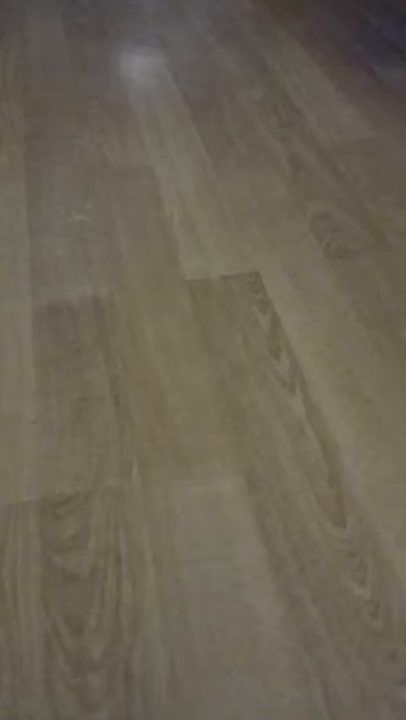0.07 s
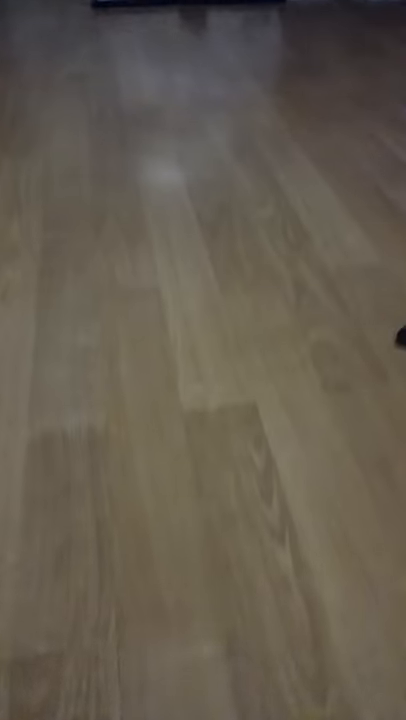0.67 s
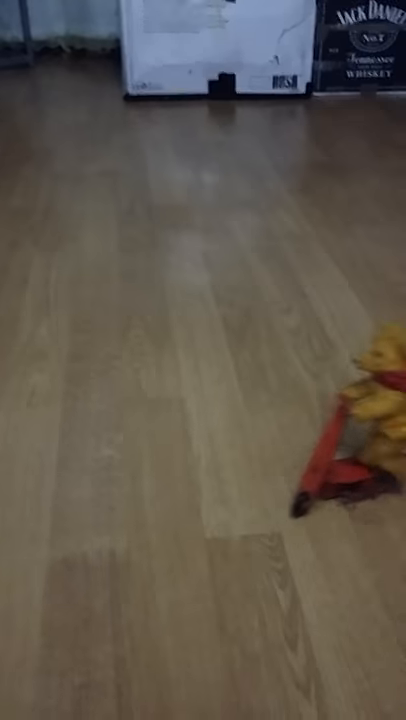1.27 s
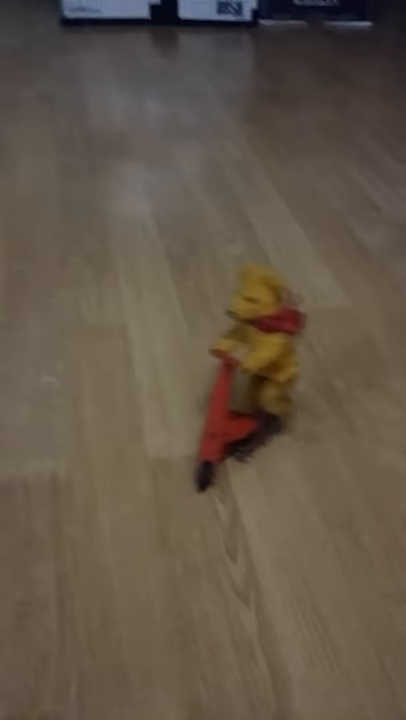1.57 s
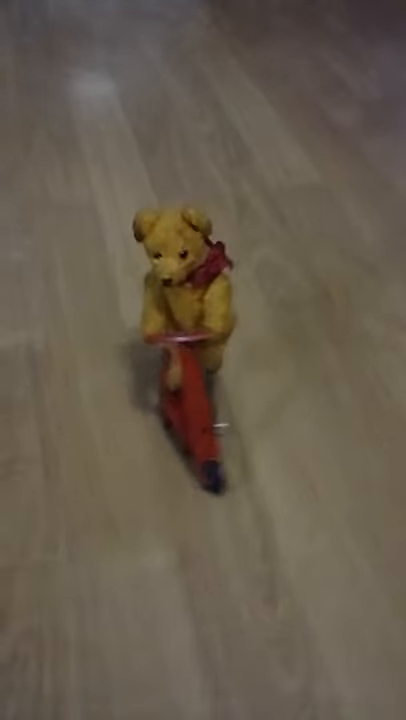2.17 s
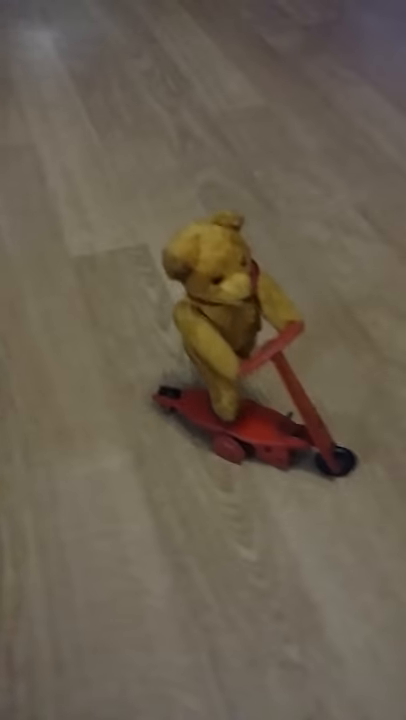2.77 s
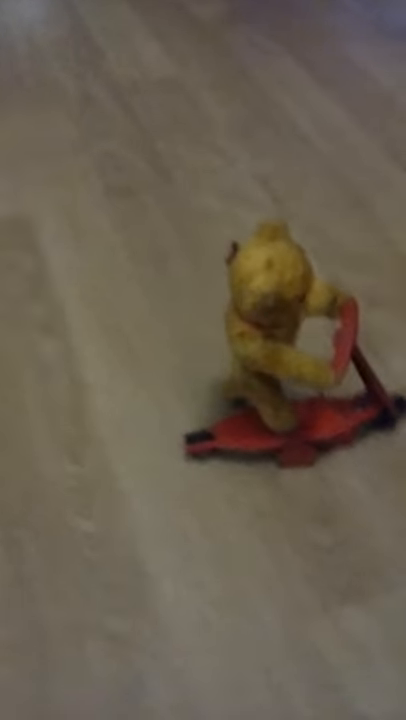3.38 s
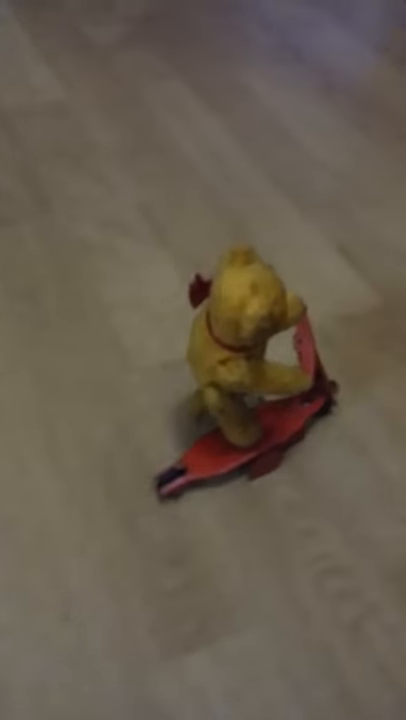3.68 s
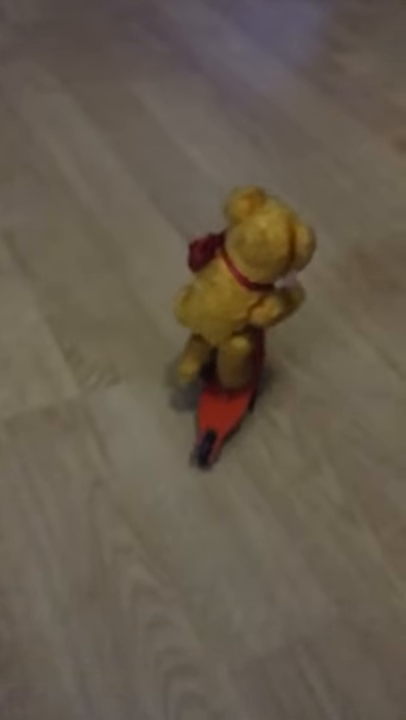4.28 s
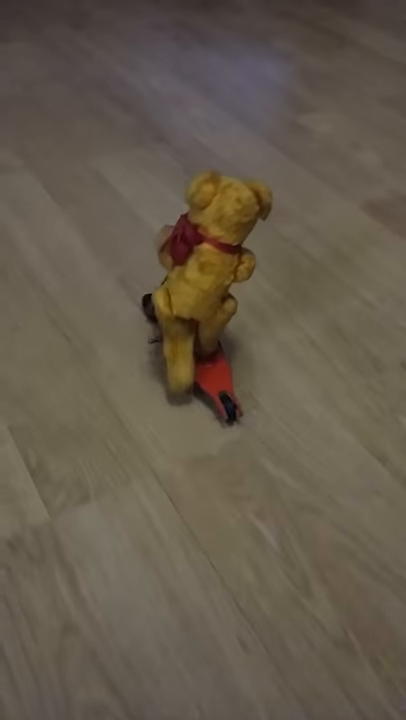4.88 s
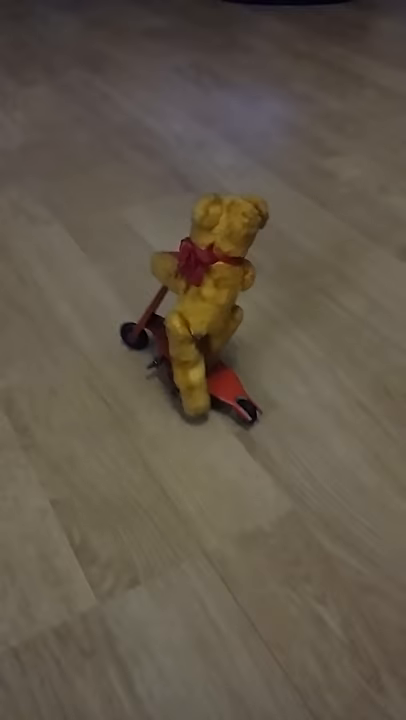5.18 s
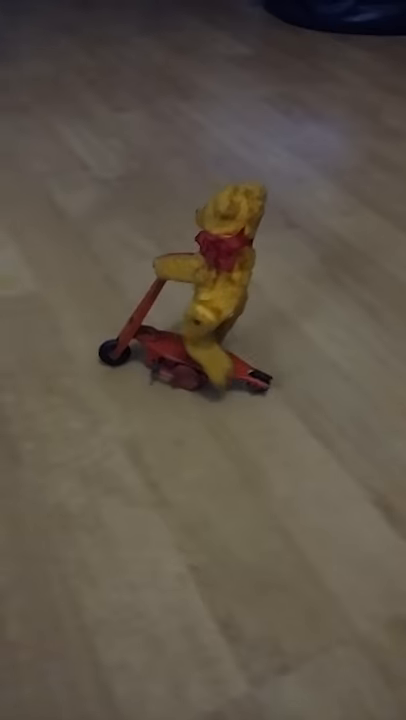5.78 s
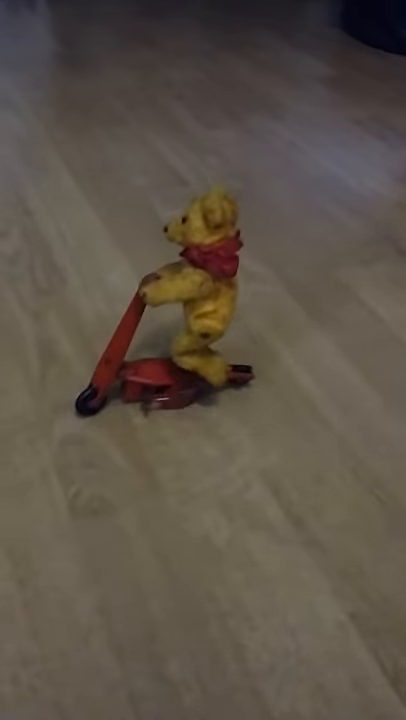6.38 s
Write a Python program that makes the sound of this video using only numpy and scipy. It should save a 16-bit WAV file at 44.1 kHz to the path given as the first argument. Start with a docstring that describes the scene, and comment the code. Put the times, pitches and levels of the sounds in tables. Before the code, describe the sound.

A wind-up tin toy scoots across a hard floor, its bright whirring rattle surging rhythmically, with sharp little clacks.

```python
"""A whirring tin chatter fades in: a clockwork bear scoots round a laminate floor in a small quiet room.
The off-centre governor of its spring motor spins about a hundred times a second: it makes the loose tin
parts chatter, knocks the chassis on the floor and hums. Each kick of the leg loads the motor, so speed
and rattle surge three times a second. A faint clear tone comes and goes, the floor thuds softly near
the start, and the leg linkage clacks in short, ringing runs."""
import sys
import numpy as np
from scipy import signal
from scipy.fft import rfft, irfft
from scipy.io import wavfile
from scipy.ndimage import uniform_filter1d

SR = 44100
rng = np.random.default_rng(int(sys.argv[2]) if len(sys.argv) > 2 else 0)


def wav_out(sig):
    """Save sig, one row per channel (or a flat mono array), as 16-bit PCM at SR to the path in sys.argv[1]."""
    wavfile.write(sys.argv[1], SR, np.round(np.clip(np.atleast_2d(sig).T, -1, 1) * 32767).astype(np.int16))


N = 288414
T = np.arange(N) / SR
ROOM_T60_S = 0.27


def from_db(db):
    return 10 ** (np.asarray(db) / 20)


def unit_rms(x):
    return x / np.sqrt(np.mean(x ** 2) + 1e-20)


def automation(rows):
    """One lane per column after the time, drawn sample by sample."""
    times, *columns = np.transpose(rows)
    return [np.interp(T, times, column) for column in columns]


def centred(db):
    """A level lane about its median."""
    return db - np.median(db)


def eq_curve(points, hz):
    """Breakpoints joined on a log-frequency axis."""
    point_hz, values = np.transpose(points)
    return np.interp(np.log(hz + 1), np.log(point_hz), values)


def drift(per_s):
    """A smooth random wobble of rms 1."""
    return unit_rms(np.interp(T * per_s, np.arange(4096), rng.standard_normal(4096)))


def bumps(times, width_s):
    """A bell curve of height 1 at each time."""
    return sum(np.exp(-((T - s) / width_s) ** 2) for s in times)


def clicks(times, sizes):
    """A train of single-sample impacts."""
    at = np.round(np.asarray(times) * SR).astype(int)
    inside = (at >= 0) & (at < N)
    return np.bincount(at[inside], np.asarray(sizes)[inside], N)


def knocks(beats, lag_s, jitter_s, spread_db):
    """One contact per governor turn, a little uneven in time and force."""
    late, force = rng.standard_normal((2, 1024))[:, :len(beats)]
    return clicks(beats + lag_s + jitter_s * late, from_db(spread_db * force))


def ticks(per_s, db):
    """Tiny impacts, random in time and size."""
    return (rng.random(N) < per_s / SR) * rng.standard_normal(N) * from_db(db)


def filtered(x, order, hz, kind):
    return signal.sosfilt(signal.butter(order, hz, kind, fs=SR, output="sos"), x)


def levelled(x, window=3500):
    """Even out slow swells, holding the mono mix near rms 1."""
    power = uniform_filter1d(x.mean(0) ** 2, window)
    return x / np.sqrt(np.maximum(power, 0) + 1e-12)


def ride_band(x, band_hz, db):
    """Swell and fade one band about its usual level."""
    band = signal.sosfiltfilt(signal.butter(2, band_hz, "band", fs=SR, output="sos"), x)
    return x + (from_db(centred(db)) - 1) * band


def resonance(x, hz, width_hz):
    """A ringing band whose centre can glide."""
    carrier = np.exp(2j * np.pi * np.cumsum(np.broadcast_to(hz, N)) / SR)
    pole = np.exp(-np.pi * width_hz / SR)
    return 2 * np.real(carrier * signal.lfilter([1 - pole], [1, -pole], x / carrier))


# Stereo placement. Each row: frequency in Hz, left over right in dB.
STEREO_BALANCE = [(100, -1.5), (190, -5), (330, 2.5), (700, -1.5), (1600, -1), (2600, -3.5), (3800, -10.5),
                  (4600, 1.5), (5500, 9.5), (7800, 9.5), (10000, 7.5), (12700, -9.5), (16000, -1)]
# Stereo width. Each row: frequency in Hz, likeness of the two sides (1 is mono).
STEREO_LIKENESS = [(100, 0.99), (300, 1), (600, 0.89), (1200, 0.15), (3000, 0.24), (6000, 0.048),
                   (12000, 0.086)]


def body_response(colour, t60, room_db, modes=(), modes_db=0, size=16384):
    """The stereo answer to one knock: a body's crowded short rings, any longer tones, the room's tail."""
    t, hz = np.arange(size) / SR, np.fft.rfftfreq(size, 1 / SR)
    body = unit_rms(from_db(-60 * t / t60))
    room = unit_rms(from_db(-60 * t / ROOM_T60_S) * (t > .006))
    mid, side = rfft(rng.standard_normal((2, size)) * np.hypot(body, from_db(room_db) * room))
    if len(modes):
        rings = 0
        for mode_hz, db, ring_s in modes:
            detune = rng.normal(1, .035)  # a slightly different pitch in each response
            tone = np.sin(2 * np.pi * mode_hz * detune * t) * rng.choice([-1, 1])
            rings = rings + from_db(db - 60 * t / ring_s) * tone
        mid = mid + from_db(modes_db) * rfft(unit_rms(rings))
    sides = np.array([[1], [-1]])
    alike = np.clip(eq_curve(STEREO_LIKENESS, hz), 0, 1)
    pan = from_db(sides * eq_curve(STEREO_BALANCE, hz) / 2)
    gain = from_db(eq_curve(colour, hz)) * pan / np.hypot(*pan)
    # a passive body answers only after the blow: minimum phase
    cepstrum = irfft(np.log(gain)) * (1 + np.sign(t)) * (t < t[size // 2])
    stereo = np.sqrt(1 + alike) * mid + np.sqrt(1 - alike) * side * sides
    out = irfft(stereo * np.exp(rfft(cepstrum)))
    return out / np.sqrt(np.sum(out ** 2) / 2)


def moving_body(drive, colour, stretches, **body):
    """Play a body on the move, crossfading to a new response for each stretch of its path."""
    out, step = np.zeros((2, 2 * N)), N // stretches + 1
    for centre in range(0, N + step, step):
        at = np.arange(max(centre - step, 0), min(centre + step, N))
        faded = drive[at] * np.cos(np.pi / 2 * (at - centre) / step)
        part = signal.fftconvolve(faded[None], body_response(colour, **body), axes=1)
        out[:, at[0]:at[0] + part.shape[1]] += part
    return out[:, :N]


# Leg kicks, each lasting until the next. Each row: start in seconds, fastest swing in seconds,
# top speed in turns per second, then chatter, hum and hum octave faders in dB.
LEG_KICKS = [(0.46, 0.66, 109, -26.5, -45.5, -43), (0.777, 0.942, 107.6, -26, -45, -48),
             (1.084, 1.263, 114, -27, -45, -47.5), (1.389, 1.531, 103.6, -27, -47.5, -44),
             (1.664, 1.836, 103.3, -28, -50.5, -51), (1.988, 2.168, 109, -25, -50, -43),
             (2.28, 2.446, 103, -27, -51, -47.5), (2.611, 2.831, 96.5, -26.5, -46.5, -42.5),
             (2.924, 3.138, 94.6, -28, -44, -44), (3.27, 3.414, 96, -27.5, -49, -45.5),
             (3.473, 3.835, 95, -27, -46, -42.5), (3.972, 4.2, 96, -27, -46, -43.5),
             (4.373, 4.51, 92.5, -29, -46.5, -42.5), (4.625, 4.864, 98, -29, -49, -45.5),
             (5.08, 5.251, 97.5, -29.5, -48, -51.5), (5.387, 5.595, 94.5, -29, -48.5, -49.5),
             (5.799, 5.957, 89.4, -29, -55.5, -55.5), (6.138, 6.315, 93.6, -29, -51.5, -55.5)]


def spring_motor():
    """Each kick loads the motor, then lets it race; the load drags more as the spring runs down."""
    start, fastest, *columns = np.transpose(LEG_KICKS)
    top_speed, top_db, hum_db, octave_db = (np.interp(T, fastest, column) for column in columns)
    end_s = start[-1] + .39
    corners = np.append(np.column_stack([start, fastest]), end_s)
    load = np.interp(T, corners, 1 - np.arange(len(corners)) % 2)  # 1 at a kick's start, 0 in free swing
    speed = top_speed - load * (2.5 + T)
    # the loose parts chatter hardest around the fastest swing
    chatter_db = top_db - (1.8 + .28 * T) * load - 2 * (1 - bumps(fastest, width_s=.035))
    stall = bumps(np.append(start, end_s), width_s=.035)
    dip_db = -10.5 * stall
    return speed, load, stall, chatter_db, hum_db + dip_db, octave_db + dip_db


def governor_beats(speed):
    """The time of each turn; the weight's swing is drawn into step with the hard clacks."""
    turns = np.cumsum(speed * (1 + .008 * drift(20))) / SR
    clack_s = np.array(HARD_CLACKS)[:, 0]
    slip = np.unwrap(np.interp(clack_s, T, turns) % 1, period=1)
    turns = turns - np.interp(T, clack_s, slip)
    return np.interp(np.arange(1, int(turns[-1])), turns, T)


# Each part's presence. Each row: time in seconds, then deck plate, shell and gear rides in unscaled dB.
PART_RIDES = [(0.62, -3, -0.5, -11), (1.08, -4, -3, -9), (1.24, -4.5, -3.5, -10), (1.58, -4.5, -1.5, -5.5),
              (2.22, -5, -3.5, -7), (2.38, -4, -4.5, -6), (2.63, -4, -5, -10), (2.97, -3, -3, -7.5),
              (3.55, -3.5, 2.5, -10), (3.74, -5.5, -5, -12), (4.29, -6, -2.5, -8.5), (4.45, -5, -6.5, -9),
              (4.88, -4.5, 0, -8), (5.04, -4, -5, -8.5), (5.53, -4, -3.5, -8), (5.93, -2.5, -4, -9),
              (6.15, -3, -3, -11), (6.52, -4, -6.5, -9)]
# The strongest shell ring, moving with the bear's pose. Each row: time in seconds, pitch in Hz.
SHELL_PITCH = [(.6, 3670), (1.5, 3200), (1.8, 3620), (2.15, 3361), (2.85, 3400), (3.15, 3480), (3.4, 3750),
               (3.56, 3500), (3.75, 3300), (4.1, 4060), (4.9, 3690), (5.25, 3984), (5.6, 3670), (6.5, 3560)]
# Two lesser rings. Each row: time in seconds, deck plate pitch in Hz, its level in dB, gear cage in Hz.
PLATE_AND_CAGE = [(0.4, 2660, -31, 5330), (1.8, 2650, -1, 5630), (2.5, 2350, 3, 5240),
                  (3.1, 2620, -5, 5367), (3.7, 2783, -1.5, 4460), (4.3, 2710, -8, 4420),
                  (5.3, 2609, -19, 4270), (6.54, 2545, -20, 4903)]
# The lowest tin ring, strong when the toy is side-on and near. Each row: time in seconds, level in dB.
LOWEST_TIN_LEVEL = [(2.3, -29), (2.75, 6), (3.15, -5.5), (3.5, -3), (3.85, -6), (4.25, 11), (4.7, -28),
                    (5.9, -10), (6.4, -4)]


def circling(x):
    """As the toy circles, its parts turn towards the listener and away, and their rings shift."""
    plate_ride, shell_ride, gear_ride = map(centred, automation(PART_RIDES))
    plate_hz, plate_db, cage_hz = automation(PLATE_AND_CAGE)
    # the loose shell shifts its contacts; the stiff plate and cage wander less
    shell_hz = automation(SHELL_PITCH)[0] * (1 + .059 * drift(16))
    plate_hz, cage_hz = (hz * (1 + .012 * drift(16)) for hz in (plate_hz, cage_hz))
    flicker_db = 5
    shell_db = -4.5 + 1.3 * shell_ride + flicker_db * drift(15)
    shell = from_db(shell_db) * resonance(x, shell_hz, width_hz=320)
    plate = from_db(plate_db + flicker_db * drift(7.1)) * resonance(x, plate_hz, width_hz=90)
    cage = from_db(-4 + flicker_db * drift(20)) * resonance(x, cage_hz, width_hz=320)
    low = from_db(automation(LOWEST_TIN_LEVEL)[0]) * resonance(x, hz=2024, width_hz=100)
    x = ride_band(x + shell + plate + cage + low, band_hz=(1750, 2820), db=2.9 * plate_ride)
    x = ride_band(x, band_hz=(3520, 3770), db=.66 * shell_ride)
    return ride_band(x, band_hz=(4470, 6400), db=1.15 * gear_ride)


# The tin shell's bright tone. Each row: frequency in Hz, level in dB.
TIN_EQ = [(500, -13), (900, -11.5), (1200, -12), (1600, -14.5), (2050, -9.5), (2600, -1.5), (3200, -3),
          (3800, -3), (4500, -5), (5500, -9.5), (6300, -15.5), (7800, -17), (11000, -31.5), (13500, -32.5),
          (16000, -28.5)]
# Its main rings. Each row: pitch in Hz, relative level in dB, seconds to fall 60 dB.
TIN_MODES = [(2160, -7.5, 0.024), (2707, -0.5, 0.018), (3210, 6, 0.083), (3525, 3, 0.19),
             (3910, 7.5, 0.089)]


def tin_chatter(beats, chatter_db, parts=4):
    """Each turn, loose tin parts hit in a row, hardest in mid-swing; gear teeth tick and rub between."""
    shake = from_db(1.6 * drift(60))
    rattle = 0
    for k in range(parts):
        swing = np.sin(np.pi * (k + .5) / parts)
        hits = knocks(beats, lag_s=(k - 1) * .0011, jitter_s=.00035, spread_db=2) * shake * swing
        teeth = ticks(per_s=160, db=-13)
        rattle = rattle + moving_body(hits + teeth, TIN_EQ, stretches=16, t60=.012, room_db=1.9,
                                      modes=TIN_MODES, modes_db=-11.5)
    rattle = filtered(levelled(rattle), order=1, hz=8000, kind="low")
    rub = moving_body(rng.standard_normal(N), TIN_EQ, stretches=30, t60=.013, room_db=-1)
    rub = from_db(6) * filtered(rub, order=3, hz=7000, kind="high")
    chatter = levelled(circling(rattle + rub), window=2200)
    # hard shaking rings the shell more than it rubs the gears
    chatter = ride_band(chatter, band_hz=(3330, 3700), db=.28 * chatter_db)
    chatter = ride_band(chatter, band_hz=(5700, 15500), db=-.42 * chatter_db)
    return from_db(chatter_db + .5 * drift(25)) * chatter


# The floor under the wheels. Each row: time in seconds, wheel fader in dB,
# then boom, drone and clatter rides in unscaled dB.
FLOOR_RIDES = [(0.62, -38, -10, -11, -6.5), (1.02, -34.5, 3, 2.5, -2), (1.27, -32.5, -18, 0.5, -4),
               (1.73, -34.5, -21, -3.5, -8), (2.07, -35.5, -21, -4.5, -17),
               (2.26, -32.5, -27.5, -1.5, -16.5), (2.63, -34, 9, -4.5, -13), (3.18, -35, 0, -22, -5.5),
               (3.34, -37, 0, -11, -6.5), (3.75, -35, -6, -15, -7), (4.15, -36, 7, -3, -2),
               (4.35, -32, -2, -27, -10), (4.51, -37, 6, -11, -2.5), (4.67, -36, -13, -2.5, -10.5),
               (5.49, -36.5, 0, -3.5, -14), (5.65, -36, -19, -4, -9), (5.9, -38.5, -10, -6, -11),
               (6.36, -35.5, -19, 1, 0.5), (6.52, -35, -15, 0, -10)]
# The boards' two resonances. Each row: time in seconds, drone in Hz, clatter in Hz.
FLOOR_PITCHES = [(.7, 335, 570), (1.3, 348, 570), (1.8, 318, 586), (2.3, 415, 650), (2.7, 397, 666),
                 (3.15, 340, 690), (3.8, 321.1, 879.2), (4.2, 325, 810), (4.7, 349.6, 620),
                 (5.4, 378, 523.3), (5.9, 400, 680.5), (6.35, 355, 699.7)]


def floorboards(x):
    """The boards boom, drone and clatter differently from place to place."""
    _, boom_ride, drone_ride, clatter_ride = automation(FLOOR_RIDES)
    drone_hz, clatter_hz = automation(FLOOR_PITCHES)
    drone = from_db(-7 + 5.1 * centred(drone_ride)) * resonance(x, drone_hz, width_hz=270)
    clatter = from_db(-4 + 2.9 * centred(clatter_ride)) * resonance(x, clatter_hz, width_hz=190)
    x = ride_band(x + drone + clatter, band_hz=(69, 230), db=.39 * boom_ride)
    return x - .47 * resonance(x, 1.24 * clatter_hz, width_hz=250)  # a scoop just above the clatter


# The dull tone of the chassis on the boards. Each row: frequency in Hz, level in dB.
CHASSIS_EQ = [(30, -90), (75, -61), (112, -7.5), (150, -3), (185, -8.5), (240, -7), (315, -2.5),
              (410, -3.5), (560, -9.5), (750, -9.5), (950, -16), (1200, -20.5), (2000, -36)]
# Low ringing tones under the drumming, the lowest two probably the room's.
# Each row: pitch in Hz, relative level in dB, seconds to fall 60 dB.
LOW_RINGS = [(303.7, 7.5, 0.1), (355, 9.5, 0.27), (427, 15.5, 0.094), (542, 8.5, 0.11), (705, 25, 0.077)]


def wheel_drumming(beats, speed, stall):
    """The wheels drum unevenly on the floorboards, booming a little more at each stall."""
    drum = 0
    for _ in range(2):
        hits = knocks(beats, lag_s=0, jitter_s=.00047, spread_db=2.8)
        rolling = ticks(per_s=200, db=-11.5)
        drum = drum + moving_body(hits + rolling, CHASSIS_EQ, stretches=20, t60=.014, room_db=-2.5,
                                  modes=LOW_RINGS, modes_db=-32)
    drum = filtered(drum, order=3, hz=135, kind="high")
    drum = levelled(floorboards(drum))
    drum = ride_band(drum, band_hz=(140, 263), db=2.5 * stall)
    # at twice the turning rate the floor moves with the hum rather than with the wheels
    return drum - .8 * resonance(drum, 2 * speed, width_hz=45)


# Lurches of the toy. Each row: time in seconds, change of wheel level in dB.
LURCH_ACCENTS = [(1.05, 2), (1.35, -1), (1.58, 1.5), (2.41, 1), (2.818, 1), (3.17, 3), (3.278, 4),
                 (4.071, 2), (4.67, 2), (4.98, 2.5), (5.35, 2.5), (5.7, 3.5), (6.431, 4)]


def wheel_fader():
    """The drumming's gain follows the boards underneath and jumps as the toy lurches."""
    lurch_db = sum(db * bumps([s], width_s=.036) for s, db in LURCH_ACCENTS)
    return from_db(automation(FLOOR_RIDES)[0] + lurch_db + drift(25) + .46)


def governor_hum(speed, hum_db, octave_db):
    """The unbalanced governor shakes the floor at its turning rate and the octave."""
    phase = 2 * np.pi * np.cumsum(speed) / SR + .25 * drift(40)
    octave = from_db(octave_db + 1.6 + drift(43)) * np.sin(2 * phase + .2 * drift(40))
    fundamental = from_db(hum_db + 1.4 * drift(50)) * np.sin(phase)
    return np.sqrt(2) * (fundamental + octave)


# A long clear tone that comes and goes. Each row: time in seconds, level in dB.
SINGING_LEVEL = [(.6, -51), (.9, -45), (1.2, -57), (1.6, -48), (1.9, -58), (3, -57), (3.2, -41), (3.4, -56),
                 (4.05, -52.5), (4.3, -41), (4.5, -48), (5, -46.5), (5.5, -48), (5.7, -39.5), (5.85, -48),
                 (6.03, -44), (6.15, -55), (6.5, -53)]


def singing_ring():
    """The shaking keeps one narrow resonance singing, probably the mainspring."""
    ring = resonance(rng.standard_normal((1, N)), hz=500, width_hz=6)
    return from_db(automation(SINGING_LEVEL)[0]) * levelled(ring)


# Soft thuds in the floor. Each row: start in seconds, level in dB.
FLOOR_THUDS = [(0.5, -38), (0.95, -57)]


def floor_thuds(attack_s=.023, t60=.5):
    """The floor booms briefly, deep and dull, over a trace of steady rumble."""
    envelope = from_db(-98)
    for start, db in FLOOR_THUDS:
        age = np.maximum(T - start, 0)
        envelope = envelope + from_db(db - 60 * age / t60) * np.minimum(age / attack_s, 1)
    rumble = filtered(rng.standard_normal(N), order=2, hz=(50, 85), kind="band")
    return envelope * unit_rms(rumble)


# Runs of clacks in the leg linkage. Each row: start in seconds, knock fader in dB,
# number of contacts, ring pitch in Hz, ring fader in dB.
HARD_CLACKS = [(0.613, -26, 1, 3700, -23), (0.6414, -19.5, 3, 3620, -8.5), (0.6867, -16.5, 3, 3670, -15),
               (0.7231, -34, 2, 3560, -12.5), (0.8172, -28, 2, 3570, -11.5), (0.883, -18, 2, 3510, -12),
               (0.9043, -17, 3, 3470, -16), (0.9472, -18, 3, 3820, -13.5), (1.2023, -19, 2, 3580, -13),
               (1.2293, -33, 2, 3580, -15), (1.255, -23, 1, 3800, -14), (1.2826, -21, 3, 3780, -15),
               (1.4328, -18, 2, 3750, -23), (1.4799, -16, 2, 3860, -14), (1.5815, -16, 2, 3740, -15),
               (1.7276, -12, 4, 4440, -32), (1.7731, -19, 1, 3790, -8.5), (1.7956, -17.5, 3, 3860, -17),
               (1.8527, -14.5, 2, 3296, -13), (1.872, -15.5, 2, 3720, -9.5), (1.8965, -20, 3, 3280, -11.5),
               (1.9697, -22, 2, 4530, -19), (2.0178, -17, 1, 3280, -22), (2.066, -17, 1, 3570, -23),
               (2.114, -14.5, 4, 3444, -17), (2.1867, -19, 2, 3480, -12.5), (2.3237, -16, 1, 3940, -19),
               (2.4202, -14, 2, 3050, -21), (2.8142, -16.5, 3, 3940, -25.5), (2.8541, -27, 1, 2600, -13),
               (2.9745, -16, 2, 2630, -16), (3.0176, -15, 3, 2100, -19), (3.1005, -18, 1, 2620, -9.5),
               (3.1424, -14.5, 3, 3560, -12), (3.191, -15, 1, 3200, -18), (3.2577, -24, 1, 2600, -14),
               (3.2704, -15.5, 1, 2700, -10), (3.3495, -17, 1, 3660, -18), (3.4117, -32, 1, 3700, -22),
               (3.425, -15.5, 1, 3550, -17), (3.497, -22, 1, 3330, -18), (3.553, -30, 1, 3380, -12),
               (3.562, -20, 1, 3400, -14), (3.6188, -20, 1, 2770, -12), (3.6837, -16.5, 1, 2720, -19),
               (3.727, -28, 2, 3270, -21), (3.7979, -14, 2, 3170, -14), (3.829, -17, 1, 4100, -21),
               (3.8389, -14, 2, 2650, -20), (3.9683, -29, 1, 4500, -16), (4.0671, -15, 4, 3670, -31),
               (4.1809, -12, 2, 4050, -21), (4.232, -18, 3, 3922, -20), (4.2935, -17.5, 2, 2744, -14),
               (4.3244, -14.5, 1, 3802, -21), (4.345, -17.5, 2, 3880, -20), (4.4012, -19.5, 1, 3693, -16),
               (4.517, -19, 2, 3862, -12), (4.549, -20, 2, 4005, -18), (4.6248, -20, 2, 3814, -19),
               (4.648, -20, 1, 3677, -15), (4.679, -21, 3, 3867, -13), (4.725, -16, 3, 3720, -13),
               (4.8196, -16.5, 3, 3860, -19), (4.8634, -15, 4, 3897, -8), (4.9808, -16.5, 2, 4003, -34),
               (5.037, -24, 2, 3900, -28), (5.161, -16, 2, 3900, -16), (5.2159, -16, 1, 4100, -12),
               (5.244, -23, 2, 3970, -12.5), (5.2669, -15, 1, 3480, -12), (5.4, -18.5, 1, 3900, -16),
               (5.4445, -20, 2, 4130, -19), (5.523, -24, 1, 3440, -16), (5.628, -20, 1, 3730, -17),
               (5.935, -16.5, 3, 2654, -22), (5.986, -20, 1, 3300, -23), (6.282, -12.5, 2, 3760, -16),
               (6.3429, -28, 1, 3737, -13), (6.4078, -18, 4, 2860, -17)]


def clack_cues(beats, speed, load, bounce_loss_db=1.8, soft_chance=.26, soft_db=-37):
    """Fading runs of hard contacts, one a turn, and chance soft ones, likelier as the leg swings free."""
    hard = []
    for start, knock_db, contacts, hz, ring_db in HARD_CLACKS:
        turns_per_s = np.interp(start, T, speed)
        for k in range(contacts):
            loss_db = k * bounce_loss_db
            hard.append((start + k / turns_per_s, knock_db - loss_db, hz, ring_db - loss_db))
    chance, part = rng.random((2, 1024))[:, :len(beats)]
    struck = chance < soft_chance * (1 - np.interp(beats, T, load))
    soft = [(s, soft_db, hz, soft_db - 7) for s, hz in zip(beats[struck], 2400 + 1600 * part[struck])]
    return np.array(sorted(hard + soft))


def clack_ducking(clacks, depth_db=-2):
    """A turn whose force goes into a clack shakes the other parts less."""
    marks = clicks(clacks[:, 0] + .002, np.ones(len(clacks)))
    gate = np.clip(uniform_filter1d(marks, size=500) * 500, 0, 1)
    return from_db(depth_db * uniform_filter1d(gate, size=150))


def in_room(train, room_db, size=12000):
    """Impacts followed by the room's tail, different on each side."""
    t = np.arange(size) / SR
    tail = rng.standard_normal((2, size)) * from_db(-60 * t / ROOM_T60_S) * (t > .006)
    wet = signal.fftconvolve(train[None], unit_rms(tail) / np.sqrt(size), axes=1)[:, :N]
    return train + from_db(room_db) * wet


# The tone of a linkage knock. Each row: frequency in Hz, level in dB.
LINKAGE_EQ = [(60, -51), (300, -2.5), (800, -2), (1500, -5), (2100, 7.5), (3200, 6), (3850, 13),
              (4600, 5.5), (5800, 2), (6800, -8.5), (9000, -13.5), (15000, -26.5)]


def leg_linkage(clacks):
    """Slack is taken up with a light touch and a broad knock; the struck tin rings at its own pitch."""
    times, knock_db, hz, ring_db = clacks.T
    touches = clicks(times - .0012, from_db(knock_db - 7))
    blows = clicks(times + .00065, from_db(knock_db))
    knock = moving_body(touches + blows, LINKAGE_EQ, stretches=24, t60=.013, room_db=-3)
    ring_hz = hz[np.maximum(np.searchsorted(times, T) - 1, 0)]  # held until the next clack
    ping = in_room(clicks(times + .001196, from_db(ring_db)), room_db=-3.5)
    for width_hz in (600, 135):
        ping = resonance(ping, ring_hz, width_hz)
    pan_right = from_db([[-7], [0]])
    return from_db(15.5) * knock + from_db(32) * ping * pan_right


def scene():
    """One motor paces the chatter, wheels, hum and clacks; the clear tone and thuds sit underneath."""
    speed, load, stall, chatter_db, hum_db, octave_db = spring_motor()
    wheel_gain = wheel_fader()
    beats = governor_beats(speed)
    clacks = clack_cues(beats, speed, load)
    chatter = tin_chatter(beats, chatter_db) * clack_ducking(clacks)
    tin = (chatter + leg_linkage(clacks)) * from_db([[.085], [-.085]])  # a hair to the left
    wheels = wheel_gain * wheel_drumming(beats, speed, stall)
    return tin + wheels + governor_hum(speed, hum_db, octave_db) + singing_ring() + floor_thuds()


def record(dry):
    """The sound fades in after a moment's silence; the deepest bass and the very top are cut."""
    silence_s, fade_s, top_hz = .38, .24, 15850
    gate = np.clip((T - silence_s) / .03, 0, 1)
    fade = from_db(-17.5 * np.clip(1 - (T - silence_s) / fade_s, 0, 1))
    thinned = filtered(dry * gate * fade, order=3, hz=48, kind="high")
    return signal.sosfilt(signal.ellip(12, .1, 90, top_hz, fs=SR, output="sos"), thinned)


dry = scene()
out = record(dry)
wav_out(out)
```